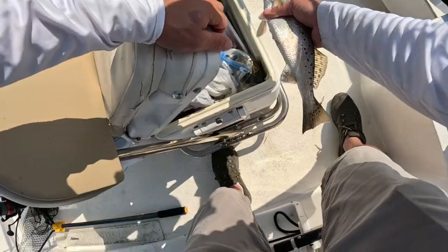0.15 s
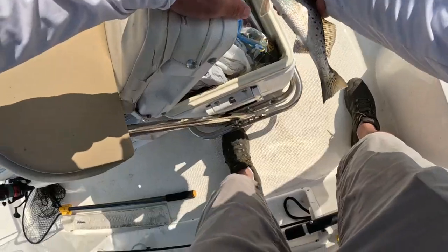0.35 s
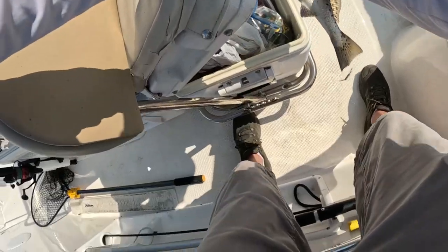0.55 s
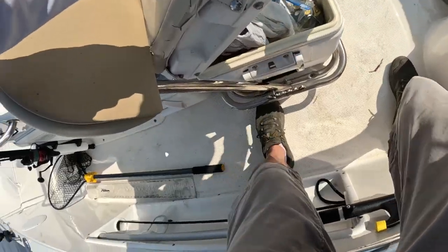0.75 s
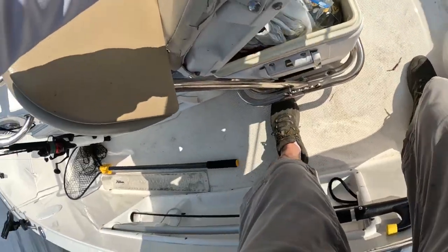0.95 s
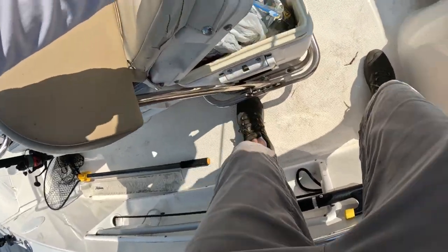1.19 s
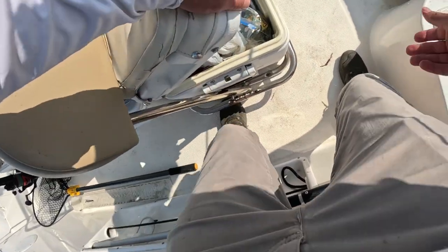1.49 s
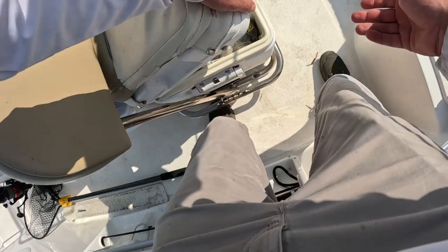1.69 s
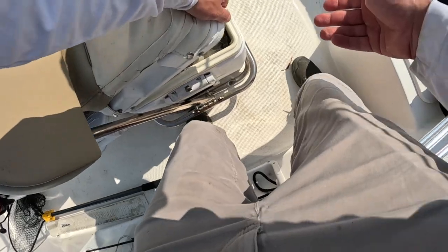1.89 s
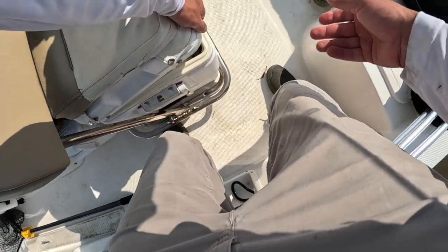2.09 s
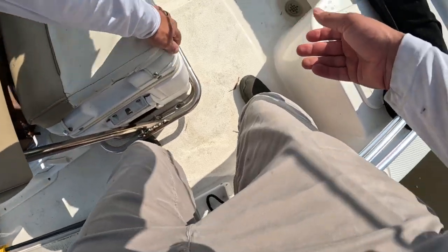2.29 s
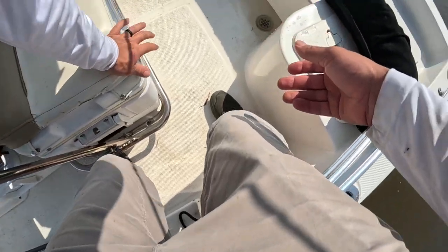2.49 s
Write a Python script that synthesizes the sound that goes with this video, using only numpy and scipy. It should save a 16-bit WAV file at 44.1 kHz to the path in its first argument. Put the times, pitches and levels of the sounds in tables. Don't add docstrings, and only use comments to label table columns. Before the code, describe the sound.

A fish thrashes in a hollow plastic box on a boat deck: a few quick thumps, a brief lull, then a dense flurry of wet slaps and knocks that weakens, heard close in open air.

```python
import sys
import numpy as np
from scipy import signal
from scipy.fft import rfft, irfft
from scipy.io import wavfile
from scipy.ndimage import uniform_filter1d

SR = 44100
rng = np.random.default_rng(int(sys.argv[2]) if len(sys.argv) > 2 else 0)


def decibels_to_gain(level_db):
    exponent = np.asarray(level_db, float) / 20
    return 10 ** exponent


def dump(signal):
    limited = np.clip(np.atleast_2d(signal).T, -1, 1)
    pcm = np.round(limited * 32767).astype(np.int16)
    wavfile.write(sys.argv[1], SR, pcm)


N = 116865
LEAD_IN_S = 0.02

# frequency in Hz, level in dB, t60 in seconds.
BOX_MODES = [(164.4, 8.5, 0.042), (228.7, -7, 0.091), (289.3, -6.5, 0.11), (348.2, 1.5, 0.057),
             (404.2, 1.5, 0.066), (483.3, 3, 0.028), (627, -10, 0.055)]
# start in seconds, peak in dB.
HEAVES = [
    (0.09, -30.5),
    (1.59, -29),
    (1.83, -22),
    (1.91, -22),
    (2.14, -28.5),
    (2.34, -27),
]
# start in seconds, peak in dB.
LATCH_TICKS = [
    (0.1547, -41),
    (2.591, -48.5),
]
# time in seconds, effort in dB.
SLIDE_EFFORT = [(0, -44), (0.389, -46), (0.418, -62), (0.454, -53), (0.513, -39.5), (.66, -39.5),
                (0.719, -56), (1.063, -58.5), (1.086, -36.5), (1.22, -42), (1.86, -46), (1.96, -42),
                (2.3, -50), (2.407, -41), (2.65, -59)]
# from in seconds, to in seconds, change in dB.
LIFTS = [
    (0.656, 0.677, -6),
    (1.2, 1.22, -3),
    (1.295, 1.34, -20),
    (1.852, 1.869, -4),
    (2.283, 2.306, -1.5),
]
# frequency in Hz, density in dB per Hz.
SCUFF_SPECTRUM = [(24, -85), (40, 2.5), (207, 6), (387, 5), (704, -8), (3840, -13.5), (5580, -19),
                  (11200, -40.5), (15500, -63.5)]
# start in seconds, peak in dB, note in Hz, t60 in seconds.
AIR_POPS = [(0.2105, -19, 1066, 0.032), (0.223, -20, 513, 0.12), (0.5741, -23.5, 3460, 0.016),
            (0.59, -20.5, 1460, 0.02), (0.6349, -8, 3200, 0.013), (0.686, -25, 1430, 0.021),
            (1.0893, -18.5, 775, 0.041), (1.121, -25.5, 2410, 0.045), (1.267, -23, 960, 0.032),
            (1.3862, -27.5, 1630, 0.025), (1.4127, -19, 2170, 0.036), (1.4145, -26, 596, 0.058),
            (1.4295, -12, 3480, 0.019), (1.5579, -25, 2180, 0.036), (1.78, -32, 1950, 0.088),
            (1.807, -11.5, 2830, 0.024), (1.813, -18, 734, 0.085), (2.03, -17.5, 620, 0.034),
            (2.033, -20.5, 2430, 0.05), (2.165, -31, 2200, 0.021), (2.375, -17, 601, 0.082),
            (2.48, -23.5, 2690, 0.044)]
# frequency in Hz, density in dB per Hz.
SPRAY_SPECTRUM = [(350, 1), (600, -8), (1620, -8), (2750, -6.5), (4140, -5.5), (6850, -9), (8990, -21.5),
                  (11800, -27), (15500, -105.5)]
# start in seconds, peak in dB, smack in Hz,
# spray t60 in seconds.
SMALL_SLAPS = [(0.183, -26, 1520, 0.038), (0.237, -27.5, 3500, 0.024), (0.281, -40, 3500, .03),
               (0.331, -15, 5000, 0.062), (0.387, -32.5, 4100, .04), (0.4579, -31.5, 4100, 0.18),
               (0.5038, -21.5, 2800, 0.064), (0.607, -28.5, 3500, 0.074), (0.8076, -36.5, 2920, 0.068),
               (1.111, -14.5, 2500, 0.037), (1.129, -18, 3020, 0.064), (1.145, -19.5, 1950, 0.03),
               (1.258, -27.5, 4420, .05), (1.291, -25, 1770, 0.11), (1.311, -25, 1780, .06),
               (1.492, -36, 3440, .05), (1.629, -25, 2530, 0.048), (1.73, -19.5, 4000, 0.019),
               (1.767, -30, 2500, .04), (1.934, -24.5, 1400, 0.031), (1.95, -24, 1820, 0.1),
               (1.985, -25, 1500, .04), (2.1236, -31, 1200, 0.04), (2.389, -24.5, 2570, .08)]
# start in seconds, peak in dB, smack in Hz, spray t60 in
# seconds.
SLAPS = [(0.0064, -21, 1480, 0.16), (0.1535, -27.5, 6000, 0.086), (0.2104, -17, 1100, 0.07),
         (0.2948, -21.5, 5450, 0.083), (0.3018, -35, 1900, 0.12), (0.338, -7.5, 1940, 0.021),
         (0.3574, -26.5, 2130, 0.13), (0.5746, -15.5, 3000, 0.032), (0.5934, -26.5, 1370, 0.15),
         (0.636, -15, 2000, 0.041), (0.6839, -22, 1480, 0.047), (0.875, -34, 2440, 0.056),
         (0.8995, -32.5, 2550, 0.051), (0.9547, -27.5, 2070, 0.03), (1.076, -26, 3600, 0.088),
         (1.09, -17.5, 1460, 0.1), (1.1188, -9.5, 2350, 0.029), (1.1342, -10, 1320, 0.056),
         (1.1581, -5, 1140, 0.043), (1.21, -17.5, 2930, 0.085), (1.267, -6.5, 1080, 0.054),
         (1.3455, -14, 3720, 0.065),
         (1.4142, -18.5, 2140, 0.015), (1.4278, -2, 3320, 0.042), (1.5107, -14.5, 1400, 0.044),
              (1.5239, -8, 2200, 0.053), (1.5582, -27.5, 2120, 0.13), (1.6004, -18.5, 1350, 0.05),
              (1.6614, -17.5, 1970, 0.025), (1.704, -15.5, 2210, 0.07), (1.735, -8, 2120, 0.045),
              (1.8067, -9, 2700, 0.052), (1.8862, -7.5, 2880, 0.042), (1.8987, -12.5, 2100, 0.062),
              (1.9917, -20, 2940, 0.072), (2.0321, -21.5, 2440, 0.052), (2.0674, -22, 2500, 0.063),
              (2.0863, -18, 2430, 0.03), (2.1587, -17.5, 1004, 0.034), (2.1901, -18.5, 1820, 0.064),
              (2.2523, -23.5, 1810, 0.082), (2.3216, -23, 2010, 0.091), (2.376, -19.5, 1050, 0.11),
              (2.3928, -34, 1030, 0.06), (2.4787, -11.5, 2570, 0.042), (2.5995, -26, 970, 0.13)]
# start in seconds, peak in dB, wall note in Hz, t60 in seconds.
THUDS = [(0.153, -21, 353, 0.14), (0.2, -15, 455, 0.027), (0.209, -13, 280, 0.068),
         (0.255, -22, 275, 0.021), (0.34, 0.5, 396, 0.021), (0.36, -6, 320, 0.033),
         (0.519, -12.5, 320, 0.059), (0.538, -10, 360, 0.035), (0.549, -22, 374, 0.1),
         (0.575, -4.5, 390.6, 0.087), (0.593, -1, 246, 0.027), (0.61, -8, 326.7, 0.13),
         (0.635, -0.5, 245, 0.044), (0.686, -10.5, 256, 0.056), (0.695, -15, 395, 0.12),
         (0.778, -34.5, 326, 0.083), (0.9, -20, 237, 0.047),
         (1.051, -21, 207, 0.17), (1.088, -12, 446, 0.032), (1.108, -5, 256, 0.049),
                (1.128, -18.5, 400, 0.12), (1.16, 0, 266.5, 0.037), (1.241, -20, 361, 0.11),
                (1.268, -1.5, 326, 0.063), (1.286, -13.5, 354.7, 0.096), (1.296, -8.5, 283, 0.035),
                (1.309, -7.5, 372.6, 0.057), (1.347, 0, 177, 0.057), (1.41, -6, 263, 0.11),
                (1.432, -5, 274, 0.027), (1.524, -7.5, 264, 0.046), (1.555, -12, 248, 0.074),
                (1.601, -13.5, 283, 0.071), (1.663, -3.5, 336.4, 0.074), (1.739, 0.5, 263, 0.044),
                (1.754, -14, 380, 0.046), (1.775, -14, 410, 0.02), (1.809, -6.5, 430, 0.01),
                (1.824, -9, 305, 0.037), (1.836, -13, 297, 0.031), (1.889, -13.5, 400, 0.019),
                (1.902, -7, 275.6, 0.022), (1.957, -19.5, 365, 0.045),
         (2.031, -6, 388.5, 0.086), (2.089, -5.5, 335.5, 0.11), (2.153, -15.5, 450, 0.022),
              (2.191, -9.5, 330, 0.038), (2.207, -17.5, 425, 0.046), (2.217, -12.5, 327, 0.075),
              (2.253, -21, 324, 0.03), (2.322, -14, 330, 0.054), (2.374, -9.5, 368.4, 0.048),
              (2.364, -21.5, 404, 0.077), (2.39, -20.5, 404, 0.084), (2.533, -27.5, 380, 0.068)]
# start in seconds, peak in dB, wall note in Hz, t60 in
# seconds.
SECOND_NOTES = [
    (0.344, -16, 210, 0.076),
                (0.899, -23, 477, 0.024),
]


def evened(x):
    return x / np.sqrt(np.mean(x ** 2) + 1e-20)


def colour(x, points):
    hz, db = np.transpose(points)
    f = abs(np.fft.fftfreq(4096, 1 / SR))
    log_gain = np.interp(np.log(f + 1), np.log(hz + 1), db) * np.log(10) / 20
    taps = np.fft.ifft(np.exp(np.conj(signal.hilbert(log_gain)))).real[:2048]
    return signal.oaconvolve(x, taps / np.linalg.norm(taps))[:len(x)]


def add(mix, start_s, sound):
    part = mix[round(start_s * SR):][:len(sound)]
    part += sound[:len(part)]


def ring(t, hz, t60_s):
    return decibels_to_gain(-60 * t / t60_s) * np.sin(2 * np.pi * hz * t)


def ragged(x):
    patch_db = 2.5
    z = signal.stft(x, nperseg=256, noverlap=192)[2]
    patches = rng.standard_normal(z.shape[::-1]).T
    patches = uniform_filter1d(patches, size=4, axis=0)
    patches = uniform_filter1d(patches, size=7, axis=1)
    return signal.istft(z * decibels_to_gain(patch_db * evened(patches)), nperseg=256, noverlap=192)[1][:N]


def heave(db):
    t = np.arange(4000) / SR
    return decibels_to_gain(db) * np.hanning(4000) * np.sin(2 * np.pi * 90 * t)


def tick(db):
    return decibels_to_gain(db) * np.diff(rng.standard_normal(200), 2) * decibels_to_gain(-np.arange(198) / 4)


def slide():
    grains_per_s, grain_db, scuff_db = 4000, 3.5, 3
    bumps_per_s, bump_db, rumble_db = 81, 10, 2
    clock = np.arange(N) / SR
    effort = decibels_to_gain(np.interp(clock, *np.transpose(SLIDE_EFFORT)))
    lift_db = sum(db * ((clock > a) & (clock < b)) for a, b, db in LIFTS) * 1.0
    effort = effort * decibels_to_gain(uniform_filter1d(lift_db, size=300))

    chance = rng.random((2, N))
    size = rng.exponential(1, (2, N))
    sign = np.sign(size - np.log(2))
    grains = (chance[0] < grains_per_s / SR) * decibels_to_gain(grain_db * np.minimum(size[0], 4)) * sign[1]
    grains = evened(grains) + 0.56 * rng.standard_normal(N)
    scuff = ragged(colour(grains, SCUFF_SPECTRUM))
    high_pass = signal.butter(2, 600, "high", fs=SR, output="sos")
    scuff = scuff / np.std(signal.sosfilt(high_pass, scuff))

    t = np.arange(8000) / SR
    box = sum(decibels_to_gain(db) * ring(t, hz, t60_s) for hz, db, t60_s in BOX_MODES)
    bumps = (chance[1] < bumps_per_s / SR) * decibels_to_gain(bump_db * np.minimum(size[1], 2)) * sign[0]
    rumble = evened(signal.oaconvolve(bumps, box)[:N])
    return effort * (decibels_to_gain(scuff_db) * scuff + decibels_to_gain(rumble_db) * rumble)


def pop(db, hz, t60_s):
    pair_ratio, rise_s = 1.09, 0.00027
    t = np.arange(6000) / SR
    t60_s = max(t60_s, 0.01)
    x = ring(t, hz, t60_s) + 0.5 * ring(t, pair_ratio * hz, t60_s)
    x = x * (1 - np.exp(-t / rise_s))
    return decibels_to_gain(db) * x / abs(x).max()


def slap(db, hz, t60_s):
    grit_db, smack_db, smack_width_hz = 2.5, -8.5, 325
    bright_ratio, rise_per_t60 = 2.075, 0.043
    lead_db, lead_s = -7, 0.0013
    noise = rng.standard_normal((9000, 2))
    t = np.arange(9000) / SR - LEAD_IN_S
    t60_s = max(t60_s, 0.01)
    grit = noise[:, 0] * decibels_to_gain(grit_db * evened(uniform_filter1d(noise[:, 1], 60)))
    band = signal.butter(1, [500, min(bright_ratio * hz, SR / 3)], "bandpass", fs=SR)
    spray = signal.lfilter(*band, evened(colour(grit, SPRAY_SPECTRUM)))
    r = np.exp(-np.pi * smack_width_hz / SR)
    smack = evened(signal.lfilter([1], [1, -2 * r * np.cos(2 * np.pi * hz / SR), r * r], grit))
    after = np.maximum(t, 0)
    shape = decibels_to_gain(-60 * after / t60_s) * (1 - np.exp(-after / (rise_per_t60 * t60_s)))
    lead = decibels_to_gain(lead_db) * np.exp(-abs(t) / lead_s)
    return decibels_to_gain(db - 5) * (shape * (spray + decibels_to_gain(smack_db) * smack) + lead * spray)


def splashes(events):
    wet = np.zeros(N + SR)
    for start_s, *row in events:
        add(wet, start_s, slap(*row))
    return ragged(wet[round(LEAD_IN_S * SR):][:N])


def thud(db, hz, t60_s, luck):
    walls_db, near_oct, luck_db, rise_s = -7.5, 0.67, 2.87, 0.0024
    shove_db, shove_hz, shove_t60_s = -19.5, 114.3, 0.13
    rib_db, rib_hz, rib_t60_s = -27.5, 725.6, 0.051
    t = np.arange(12000) / SR
    rise = 1 - np.exp(-t / rise_s)
    walls = 0
    for (mode_hz, mode_db, mode_t60_s), u in zip(BOX_MODES, luck):
        far_db = 4.1 * (np.log2(mode_hz / hz) / near_oct) ** 2
        walls = walls + decibels_to_gain(mode_db - far_db + luck_db * u) * np.sign(u) * ring(t, mode_hz, mode_t60_s)
    note = decibels_to_gain(-60 * (t / max(t60_s, 0.01)) ** 1.197) * np.sin(2 * np.pi * hz * t)
    x = (note + decibels_to_gain(walls_db) * walls) * rise ** 2
    shove = ring(t, shove_hz, shove_t60_s) * rise
    ribs = sum(ring(t, rib_hz * 2 ** (u / 2), rib_t60_s) for u in luck[::2]) * rise
    return decibels_to_gain(db) * (x / abs(x).max() + decibels_to_gain(shove_db) * shove + decibels_to_gain(rib_db) * ribs)


def close_lid(mix):
    lid_s, lid_hz = 1.97, 5000
    shut = np.clip((np.arange(N) / SR - lid_s) * 10, 0, 1)
    dull = signal.lfilter(*signal.butter(1, lid_hz, fs=SR), mix)
    return mix + shut * (dull - mix)


def scene():
    mix = slide()
    for start_s, db in HEAVES:
        add(mix, start_s, heave(db))
    for start_s, db in LATCH_TICKS:
        add(mix, start_s, tick(db))
    for start_s, *row in AIR_POPS:
        add(mix, start_s, pop(*row))
    mix = mix + splashes(SMALL_SLAPS)
    mix = mix + splashes(SLAPS)
    for start_s, *row in THUDS + SECOND_NOTES:
        add(mix, start_s, thud(*row, rng.standard_normal(len(BOX_MODES))))
    return close_lid(mix)[None]


def low_pass(x):
    return signal.sosfilt(signal.butter(12, 15710, fs=SR, output="sos"), x)


def record(dry):
    ceiling, edge_hz, low_cut_hz = 2, 15650, 188.7
    notch_hz, notch_width_hz, notch_db = 8920, 240, -8
    hz = np.fft.rfftfreq(N, 1 / SR)
    x = ceiling * np.tanh(dry / ceiling)
    notch = decibels_to_gain(notch_db * np.exp(-((hz - notch_hz) / notch_width_hz) ** 2))
    x = irfft(rfft(x) * notch * (hz < edge_hz), N)
    x = signal.sosfilt(signal.butter(2, low_cut_hz, "high", fs=SR, output="sos"), x)
    return low_pass(x)


dry = scene()
out = record(dry)
dump(out)
```